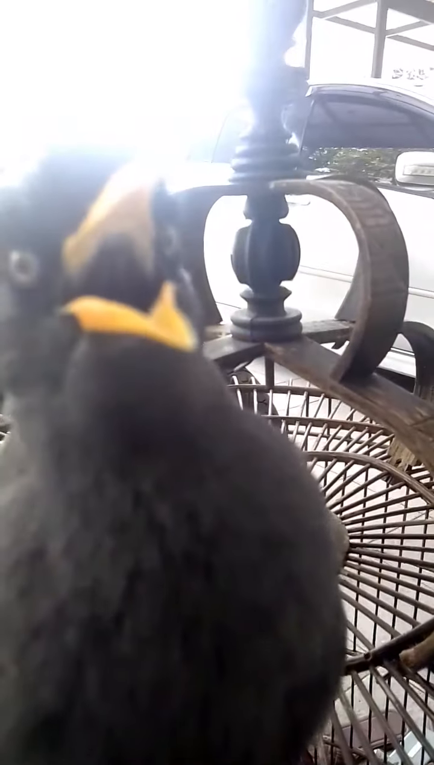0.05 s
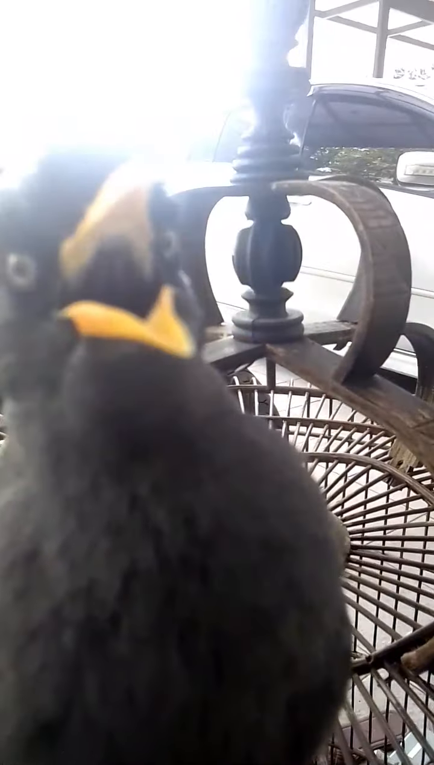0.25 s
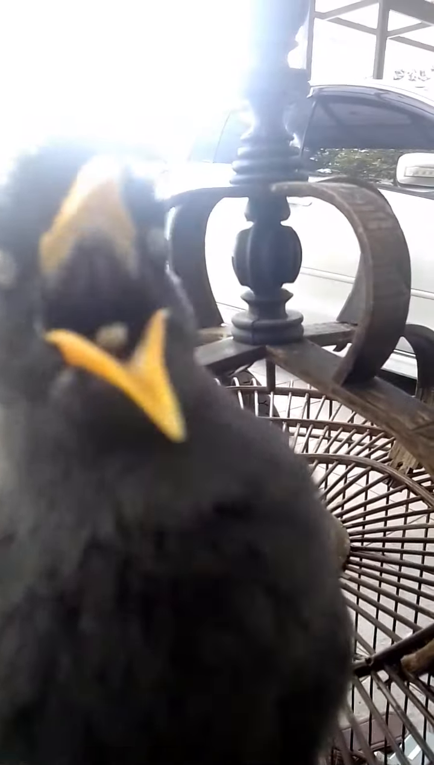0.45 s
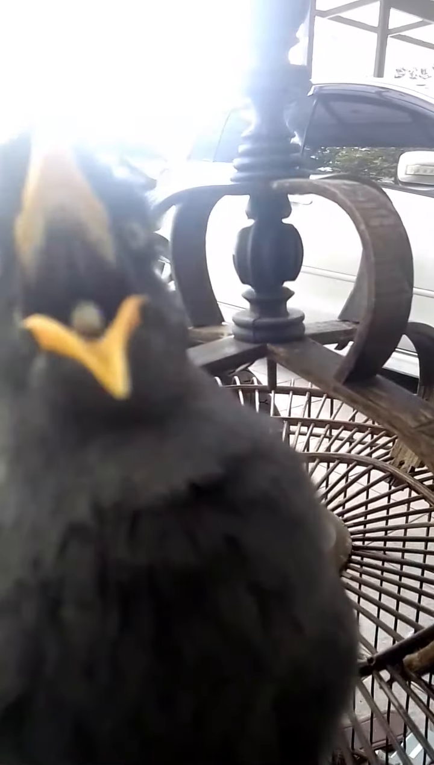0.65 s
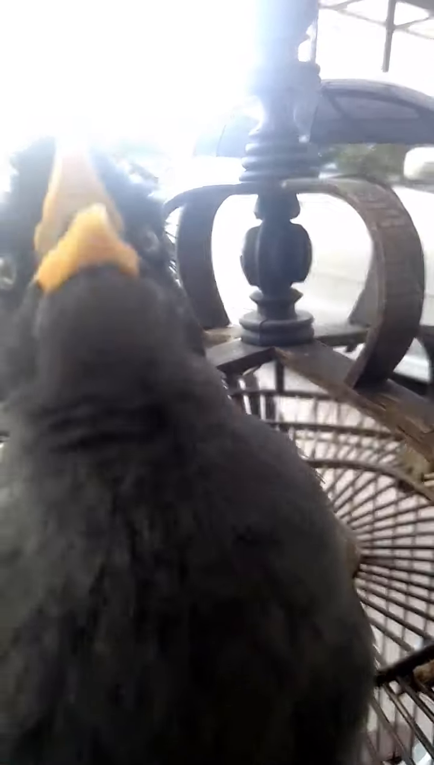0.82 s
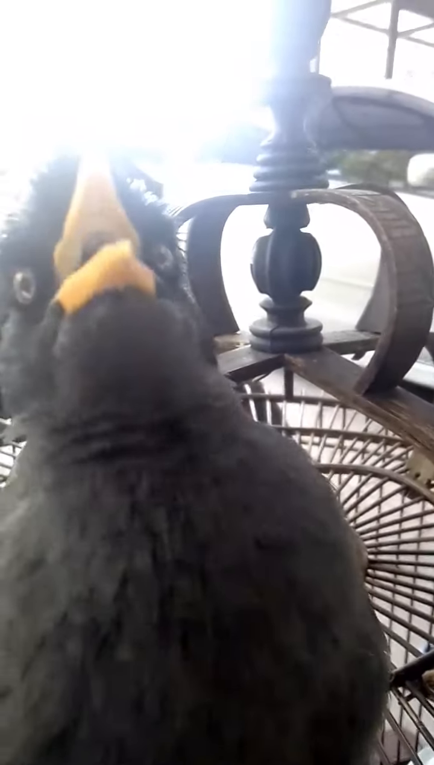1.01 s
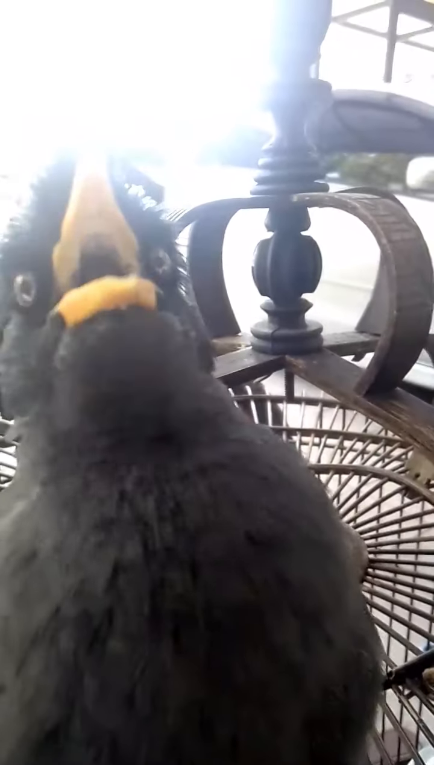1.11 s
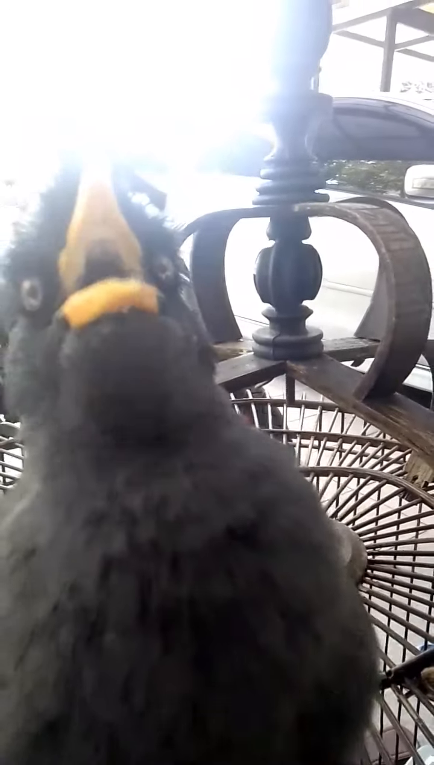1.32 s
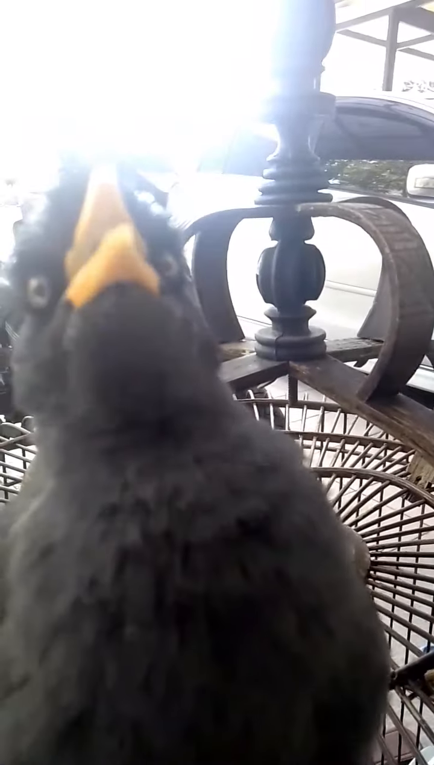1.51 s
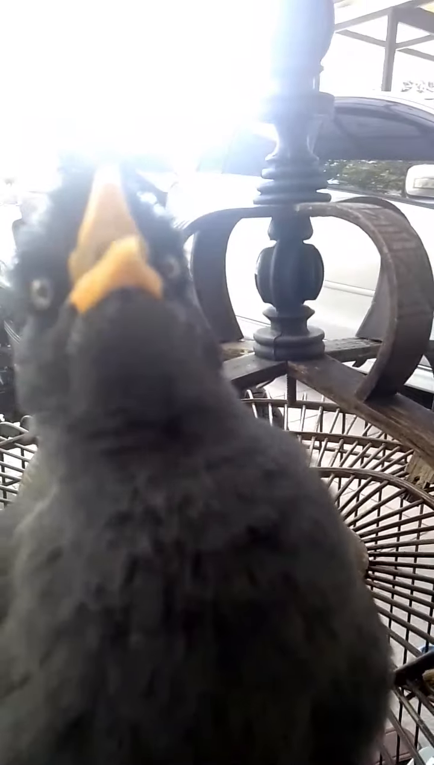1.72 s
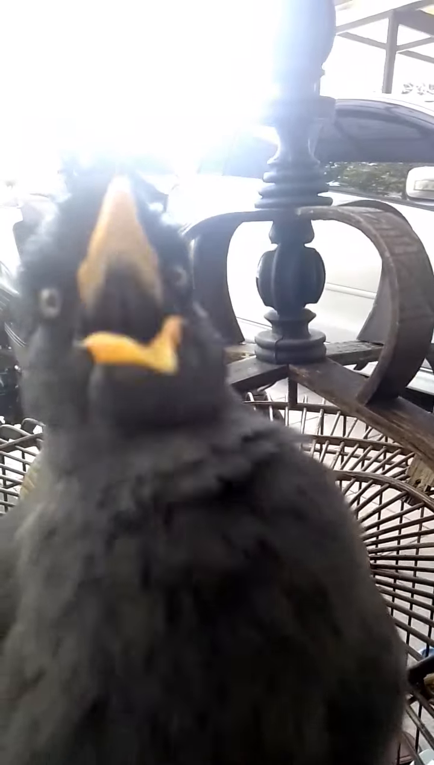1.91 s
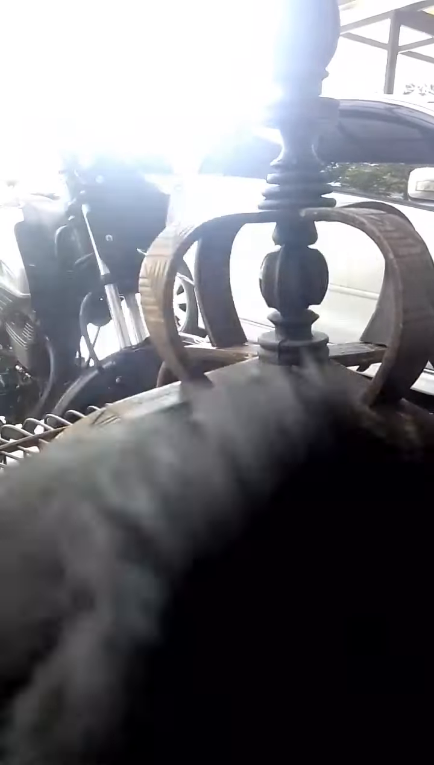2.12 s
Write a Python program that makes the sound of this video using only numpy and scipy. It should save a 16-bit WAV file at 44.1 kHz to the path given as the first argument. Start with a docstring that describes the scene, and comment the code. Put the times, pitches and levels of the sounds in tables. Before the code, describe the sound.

A myna calls close to a phone microphone. A thin fluttering trill opens, with piercing falling chirps at 0.2 and 0.3 seconds. An arched whistle follows at 0.42, then a long one from 0.68 swoops down, flutters and warbles upward until 1.2. Harsh chacks come at 1.39, 1.54 and 1.68, the first with a snap, then a short rising note and three bill clicks around 2.0. Light wall echoes, faint street noise and hum.

```python
"""A thin fluttering trill opens, then a myna close to a phone gives two chirps and two arched whistles; the second
swoops down, flutters and warbles up. Three harsh chacks follow, a bill snap within the first, then a rising
note and three more bill snaps at the end. The whistles are near-pure tones with a few overtones, the chacks
are irregular pulses through a throat filter, and the snaps are a noise crack plus short ringing tones.
Walls add two short echoes and a diffuse tail, over shaped street noise and a faint steady hum."""
import sys
import numpy as np
from scipy import signal
from scipy.fft import rfft, irfft
from scipy.io import wavfile
from scipy.ndimage import uniform_filter1d, minimum_filter1d

SR = 44100
rng = np.random.default_rng(int(sys.argv[2]) if len(sys.argv) > 2 else 0)


def generate_wav(signal):
    """Clip the signal to [-1, 1] and save it as 16-bit WAV at the path in sys.argv[1]."""
    frames = np.transpose(np.atleast_2d(signal))
    scaled = np.clip(frames, -1, 1) * 32767
    pcm = np.round(scaled).astype(np.int16)
    wavfile.write(sys.argv[1], SR, pcm)


def to_linear_factor(level_db):
    """Convert decibel levels (scalar or array-like) to linear amplitude factors."""
    exponent = np.asarray(level_db, float) / 20
    return 10 ** exponent


N = 94815

# Whistled notes, one list of points each, before flutter and warble: start_s, pitch_hz, level_db
WHISTLE_NOTES = [
    [(0, 4500, -39.5), (.059, 3750, -32), (.1, 4074, -32), (.148, 4360, -43), (.17, 5300, -33.5),
     (.18, 5520, -59.5)],
    [(.188, 5400, -42.5), (.199, 4450, -35), (.206, 3570, -14.5), (.232, 3412, -20), (.238, 3400, -70)],
    [(.285, 5050, -39), (.295, 4310, -33), (.304, 3814, -15), (.318, 3520, -20), (.327, 3500, -39)],
    [(.416, 1514, -51.5), (.423, 1998, -20), (.433, 2560, -34), (.44, 3850, -12), (.45, 3933, -8.5),
     (.465, 4350, -12.5), (.49, 4550, -14.5), (.525, 4700, -22.5), (.565, 4244, -12), (.582, 4020, -16.5),
     (.593, 3900, -45)],
    [(.676, 1618, -39.5), (.683, 2074, -22), (.691, 3230, -26.5), (.708, 4142, -8), (.742, 4574, -10.5),
     (.775, 4568, -14.5), (.817, 3827, -7.5), (.826, 3550, -17), (.87, 2560, -18), (.93, 2075, -10),
     (.965, 1951, -8.5), (.982, 1956, -20), (.994, 1947, 4), (1.002, 1850, -10), (1.012, 1680, -26),
     (1.03, 2063, -15.5), (1.09, 3092, -14), (1.145, 3506, -12.5), (1.188, 3403, -3.5), (1.197, 3180, -23)],
    [(1.7, 1000, -40), (1.728, 1545, -45.5), (1.75, 1760, -38.5), (1.764, 2030, -13.5), (1.78, 2580, -23),
     (1.8, 2739, -15.5), (1.828, 2887, -10), (1.846, 2924, -19.5), (1.868, 2750, -48)],
]
# Extra overtone strength as each note starts: overtone_boost_db, held_s
NOTE_STARTS = [(0, .01), (0, .01), (0, .01), (26, .013), (26, .011), (44, .055)]
# Second partial against the first, one per note: level_db
SECOND_PARTIAL_DB = [-28, -35, -35, -32, -33, -40]
# Breath hiss, one per note, for a tone at 0 dB: level_db
NOTE_HISS_DB = [-46, -48, -51.5, -48, -35, -47.5]
# Band of the air rushing past the syrinx (the bird's voice organ): edge_hz
NOTE_HISS_BAND = [3000, 6300]
# Windpipe and beak colour the overtones: frequency_hz, level_db
WINDPIPE = [(3500, -2), (5600, 6), (7500, -1), (10500, -5), (13300, 6), (15500, -40)]
# Fast pitch flutters: start_s, end_s, rate_hz, depth_share, level_swing_db
PITCH_FLUTTERS = [(-.01, .148, 141, .055, 3.5), (0.833, 0.975, 122, 0.073, 3.5)]
# Depth of the slow warble: time_s, depth_share
WARBLE_CURVE = [(1.01, 0.023), (1.03, .24), (1.15, .19), (1.19, 0.025)]
# Harsh bursts: three chacks, then a faint tick and the rough break-up inside the long whistle:
# start_s, level_db, attack_s, hold_s, time_to_fall_60_db_s
HARSH_BURSTS = [(1.3875, -13.5, 0.0044, .013, 0.016), (1.539, -11.5, .001, 0.015, 0.033),
                (1.678, -18.5, 0.014, 0.012, 0.15), (0.18, -39.5, .001, 0.002, .02),
                (.96, -27, .03, .03, .03)]
# Air ahead of the long whistle: start_s, level_db, attack_s, hold_s, time_to_fall_60_db_s
BREATH_EVENT = (.64, -40, .045, .02, .15)
# Band of that air: edge_hz
BREATH_BAND = [2600, 11000]
# Colour of the open throat: frequency_hz, level_db
THROAT_COLOUR = [(350, -40.5), (680, -19), (1300, -23), (1900, -3), (2700, -7.5), (3600, 1.5),
                 (5500, -20.5), (8000, -40), (12500, -36), (14500, -60)]
# Bill snaps, three at the end and one within the first chack: start_s, peak_db
SNAP_EVENTS = [(1.9752, 2), (1.9985, -1), (2.0315, 0.5), (1.3945, -5)]
# Ringing tones of the bill: frequency_hz, level_db
BILL_MODES = [(2200, -2), (3850, 9.5), (5600, 2), (12000, -14)]
# Near wall echoes: delay_s, level_db
WALL_ECHOES = [(.0056, -17), (.012, -22)]
# Band of the diffuse yard tail: edge_hz
YARD_BAND = [1000, 7000]
# Relative colour of the street noise: frequency_hz, level_db (per Hz)
STREET_COLOUR = [(60, -10), (200, -1), (500, -2), (1500, -10.5), (4000, -19.5), (14000, -30)]
# Band the microphone passes: edge_hz
MIC_BAND = [70, 13900]

# Whistle starts and edges
SETTLE_S, EDGE_S = 0.013, 0.00067
# Small random pitch (share) and level (dB) changes
JITTER, SHIMMER_DB = 0.0048, 1.57
FLUTTER_ROUGH_DB = 2
# Warble: first crest, period, share of the period spent rising; crests sharper than troughs
WARBLE_S, WARBLE_PERIOD_S, WARBLE_RISE, WARBLE_SHARP = 1.027, 0.0315, 0.35, 1.5
# Per unit of warble depth: richer overtones, less steady level
WARBLE_OVER_DB, WARBLE_ROUGH_DB = 22, 15
# Level step to each further partial; unsteadiness of the overtones
STEP_DB, OVER_ROUGH_DB = -11, 4
# Below OPEN_HZ the pitch brings more overtones and less hiss
OVER_DB_PER_OCT, HISS_DB_PER_OCT, OPEN_HZ = -8, 7, 4000
# Harsh pulses: typical rate and random spread of the gaps (natural log)
CHACK_HZ, CHACK_SCATTER = 909, 0.3
# Bill: crack level, cycles to fall 60 dB, and the low edge below which it is too small to radiate
CRACK_DB, BILL_CYCLES, BILL_LOW_HZ = -7, 16, 1200
YARD_DB, YARD_T60_S, YARD_RISE_S = -18.5, 0.32, 0.009
STREET_DB, HUM_HZ, HUM_DB = -55, 871, -60
# Limiter ceiling and clip level (full scale = 1), look-ahead, and top edge
CEILING, CLIP, LOOK_S, TOP_HZ = 0.75, 0.71, 0.002, 15500


def colour(x, points):
    """Filter through (Hz, dB) points, with no sound ahead of its cause."""
    p, size = np.array(points, float), 1024
    hz = np.maximum(np.arange(size + 1) * SR / 2 / size, 1)
    db = np.interp(np.log(hz), np.log(p[:, 0]), p[:, 1])
    # Folding the cepstrum gives the minimum-phase filter
    cepstrum = irfft(np.log(to_linear_factor(db)))
    cepstrum[1:size] *= 2
    cepstrum[size + 1:] = 0
    response = irfft(np.exp(rfft(cepstrum)))
    return signal.fftconvolve(x, response)[:len(x)]


def unit(x):
    """Scale to an average (rms) level of 1."""
    return x / np.sqrt(np.mean(x ** 2))


def ramp(x):
    """Limit to 0-1."""
    return np.clip(x, 0, 1)


def fade(u, t60):
    """Exponential decay from u = 0, falling 60 dB in t60 seconds."""
    return np.exp(-np.log(1000) * np.maximum(u, 0) / t60)


def walk(rate):
    """Smooth random curve, spread 1, changing about rate times a second."""
    k = max(int(SR / rate), 1)
    return unit(uniform_filter1d(uniform_filter1d(rng.standard_normal(N), k), k))


def band_noise(edges):
    """Noise kept between two frequencies, at rms 1."""
    return unit(signal.lfilter(*signal.butter(2, edges, "band", fs=SR), rng.standard_normal(N)))


def flutter(t):
    """Fast pitch swings with matching level swings, on top of small random changes."""
    bend, swing = JITTER * walk(500), SHIMMER_DB * walk(210)
    for start, end, hz, depth, db in PITCH_FLUTTERS:
        on = ramp(np.minimum(t - start, end - t) / 0.017)
        turn = 2 * np.pi * np.cumsum(hz * (1 + 0.25 * walk(87.2))) / SR
        bend = bend + on * depth * np.sin(turn)
        swing = swing + on * (db * np.cos(turn) + FLUTTER_ROUGH_DB * walk(130))
    return bend, swing


def warble(t):
    """Slower pitch swings that rise faster than they fall, with sharp crests."""
    u = (t - WARBLE_S) / WARBLE_PERIOD_S % 1
    depth = np.interp(t, *np.array(WARBLE_CURVE).T, left=0)
    fall = 1 - WARBLE_RISE
    from_crest = np.where(u < fall, u / fall, (1 - u) / WARBLE_RISE)
    crest = np.cos(np.pi / 2 * from_crest).clip(0) ** (2 * WARBLE_SHARP)
    return depth * (2 * crest - 1), depth


def whistles(t):
    """The syrinx sings a near sine with a few overtones and some breath, its pitch fluttering and warbling."""
    bend, swing = flutter(t)
    warble_bend, depth = warble(t)
    bend = bend + warble_bend
    swing = swing + WARBLE_ROUGH_DB * depth * walk(250)
    hiss = band_noise(NOTE_HISS_BAND) * to_linear_factor(3 * walk(300))
    rough = [OVER_ROUGH_DB * walk(150) for _ in range(6)]
    out = 0
    for note, (boost_db, held), hiss_db, second_db in zip(
            WHISTLE_NOTES, NOTE_STARTS, NOTE_HISS_DB, SECOND_PARTIAL_DB):
        s, hz, db = np.array(note, float).T
        smooth = int(EDGE_S * SR)
        pitch = uniform_filter1d(np.interp(t, s, hz), smooth) * (1 + bend)
        level_db = uniform_filter1d(np.interp(t, s, db), smooth)
        phase = 2 * np.pi * np.cumsum(pitch) / SR
        octave = np.log2(pitch / OPEN_HZ)
        over_db = second_db + OVER_DB_PER_OCT * octave + WARBLE_OVER_DB * depth
        boost = boost_db * ramp(1 - (t - s[0] - held) / SETTLE_S)
        tone = np.sin(phase)
        for k, unsteady in enumerate(rough):
            tract_db = np.interp((k + 2) * pitch, *np.array(WINDPIPE).T)
            partial_db = over_db + boost / (k + 1) ** 2 + STEP_DB * k + unsteady + tract_db
            tone = tone + to_linear_factor(partial_db) * np.sin((k + 2) * phase)
        # The hiss follows the note at half its dB changes
        breath = to_linear_factor(hiss_db + HISS_DB_PER_OCT * octave - level_db / 2) * hiss
        edge = ramp(1 + np.minimum(t - s[0], s[-1] - t) / EDGE_S)
        out = out + (np.sqrt(2) * tone + breath) * edge * to_linear_factor(level_db + swing)
    return out


def burst(t, start, db, rise, hold, t60):
    """Level curve that swells, holds and dies away."""
    return to_linear_factor(db) * fade(t - start - rise - hold, t60) * ramp((t - start) / rise) ** 2


def harsh_bursts(t):
    """Irregular syrinx pulses and hiss through the open throat, plus a rush of air before the long whistle."""
    chance = rng.standard_normal((N // 20, 2))
    gaps = SR / CHACK_HZ * np.exp(CHACK_SCATTER * chance[:, 0])
    at = np.cumsum(gaps).astype(int)
    pulses = 0.05 * rng.standard_normal(N)
    pulses[at[at < N]] += to_linear_factor(2.7 * chance[at < N, 1])
    voice = unit(colour(pulses, THROAT_COLOUR))
    air = band_noise(BREATH_BAND)
    return voice * sum(burst(t, *b) for b in HARSH_BURSTS) + air * burst(t, *BREATH_EVENT)


def snaps(t):
    """The bill halves clap: a noise crack and a few quickly dying ringing tones."""
    u, out = t[:SR // 20], np.zeros(N)
    high_pass = signal.butter(2, BILL_LOW_HZ, "high", fs=SR)
    for s, db in SNAP_EVENTS:
        noise = rng.standard_normal(len(u))
        hit = to_linear_factor(CRACK_DB) * fade(u, 0.005) * noise
        for k, (hz, mode_db) in enumerate(BILL_MODES):
            # A late noise value varies each tone's level
            strength = to_linear_factor(mode_db + 2 * noise[-1 - k])
            hit = hit + strength * fade(u, BILL_CYCLES / hz) * np.sin(2 * np.pi * hz * u)
        hit = signal.lfilter(*high_pass, hit)
        start = int(s * SR)
        out[start:start + len(u)] += to_linear_factor(db) * hit / np.abs(hit).max()
    return out


def yard(x, t):
    """Walls return a few near echoes and a diffuse tail."""
    u = t[:SR]
    tail = rng.standard_normal(SR) * fade(u, YARD_T60_S) * (1 - np.exp(-u / YARD_RISE_S))
    tail = unit(signal.lfilter(*signal.butter(1, YARD_BAND, "band", fs=SR), tail))
    tail = to_linear_factor(YARD_DB) * tail / np.sqrt(SR)
    for s, db in WALL_ECHOES:
        tail[int(s * SR)] += to_linear_factor(db)
    return signal.fftconvolve(x, tail)[:N]


def street():
    """Far traffic as shaped noise, and a faint machine hum as a slightly wavering sine."""
    hum_hz = HUM_HZ * (1 + 0.0025 * walk(4.2))
    hum = to_linear_factor(HUM_DB) * np.sin(2 * np.pi * np.cumsum(hum_hz) / SR)
    traffic = to_linear_factor(STREET_DB) * unit(colour(rng.standard_normal(N), STREET_COLOUR))
    return traffic + hum


def scene():
    """Add the bird, its yard echoes and the street."""
    t = np.arange(N) / SR
    bird = whistles(t) + harsh_bursts(t) + snaps(t)
    return (bird + yard(bird, t) + street())[None]


def roll_off(x):
    """The treble ends steeply here."""
    return signal.sosfilt(signal.butter(12, 16510, fs=SR, output="sos"), x)


def record(dry):
    """The microphone drops lows and highs; a look-ahead limiter holds the peaks and the highest still clip."""
    heard = signal.sosfilt(signal.butter(2, MIC_BAND, "band", fs=SR, output="sos"), dry)
    k = int(LOOK_S * SR)
    needed_gain = CEILING / np.maximum(np.abs(heard), CEILING)
    gain = uniform_filter1d(minimum_filter1d(needed_gain, 2 * k), k)
    clipped = np.clip(heard * gain, -CLIP, CLIP)
    mix = signal.lfilter(*signal.butter(6, TOP_HZ, fs=SR), clipped)
    return roll_off(mix)


dry = scene()
out = record(dry)
generate_wav(out)
```